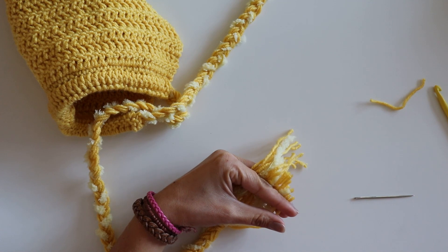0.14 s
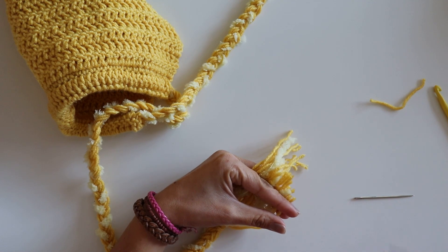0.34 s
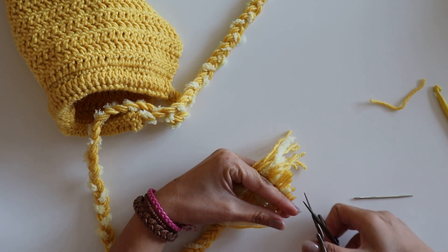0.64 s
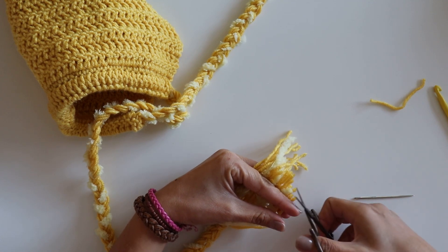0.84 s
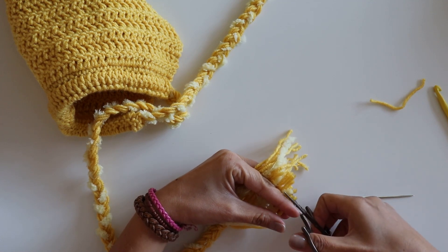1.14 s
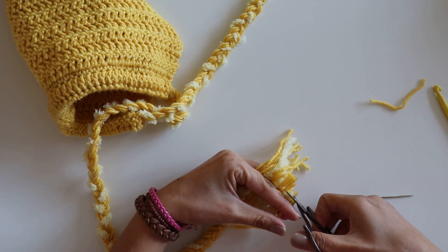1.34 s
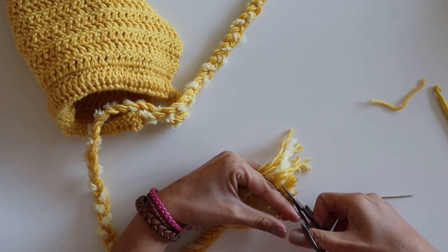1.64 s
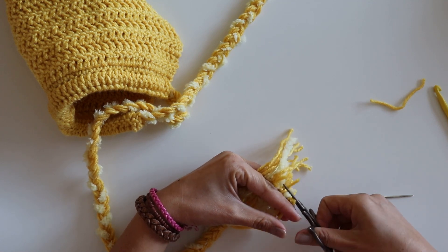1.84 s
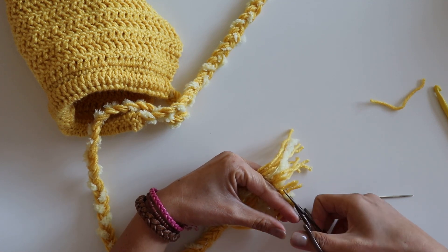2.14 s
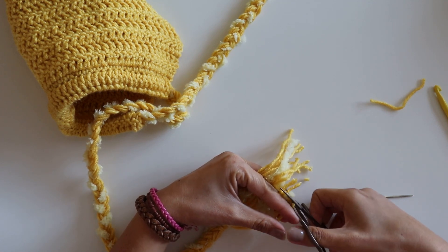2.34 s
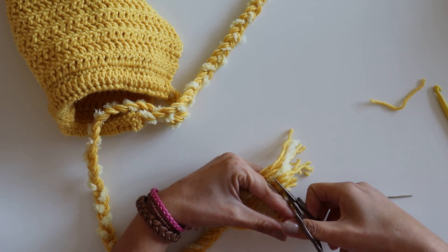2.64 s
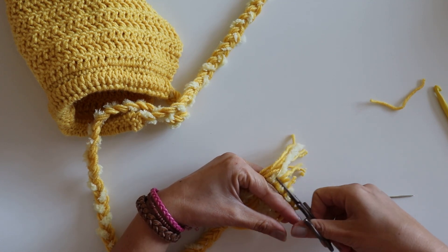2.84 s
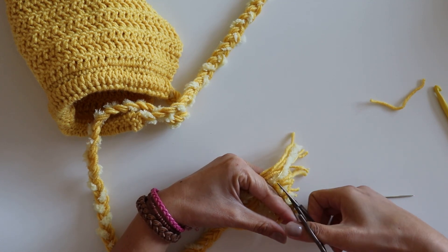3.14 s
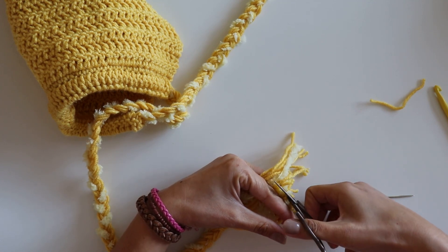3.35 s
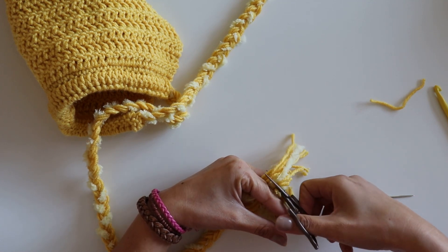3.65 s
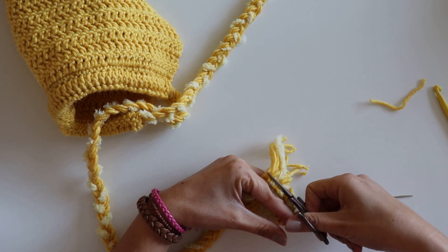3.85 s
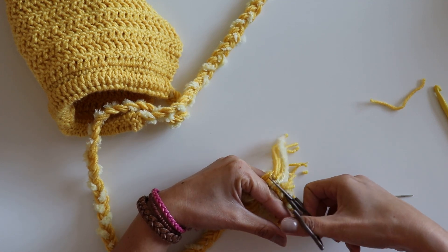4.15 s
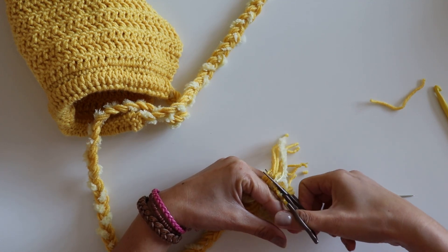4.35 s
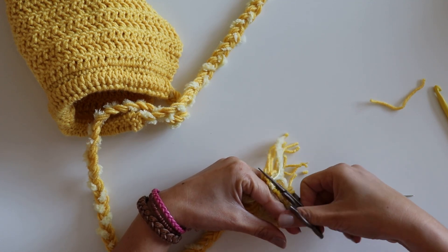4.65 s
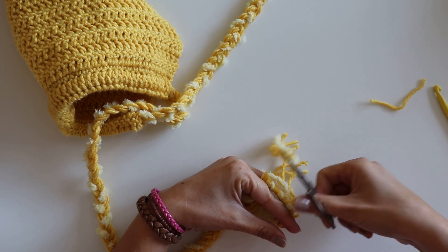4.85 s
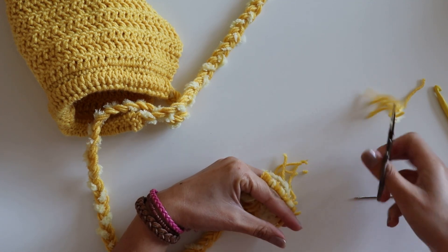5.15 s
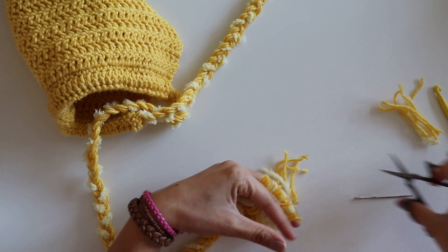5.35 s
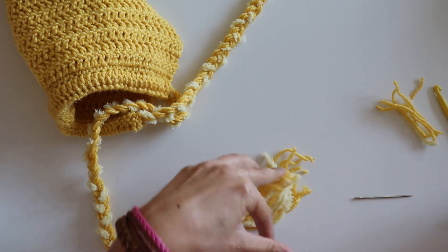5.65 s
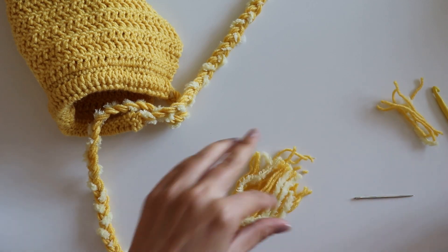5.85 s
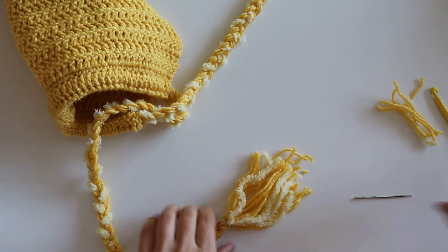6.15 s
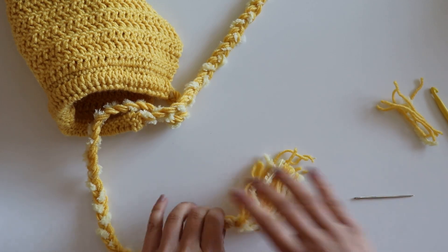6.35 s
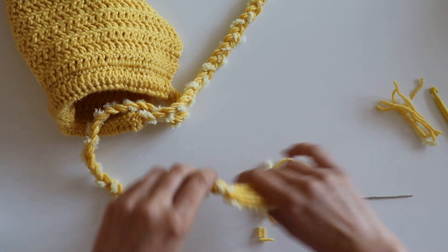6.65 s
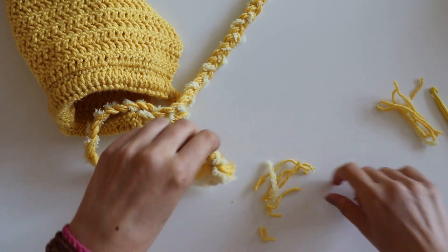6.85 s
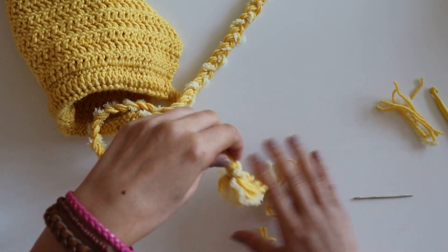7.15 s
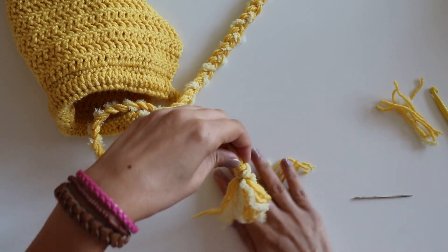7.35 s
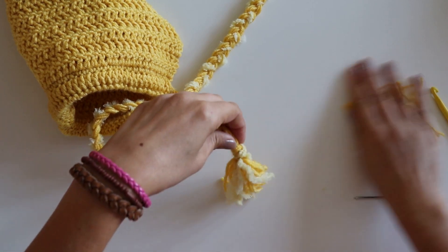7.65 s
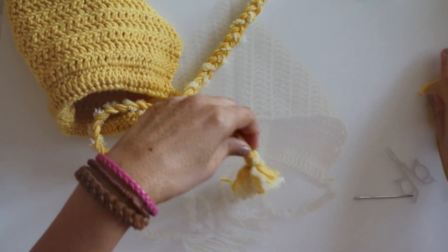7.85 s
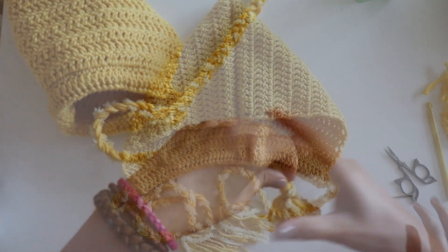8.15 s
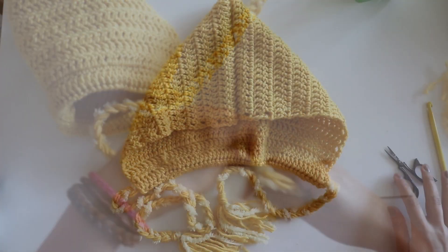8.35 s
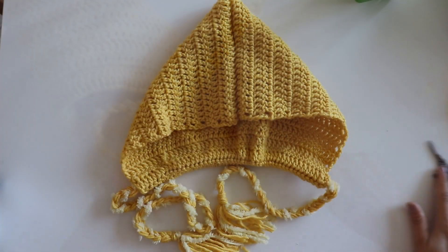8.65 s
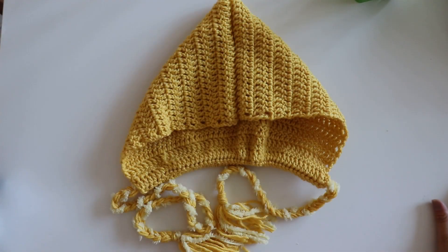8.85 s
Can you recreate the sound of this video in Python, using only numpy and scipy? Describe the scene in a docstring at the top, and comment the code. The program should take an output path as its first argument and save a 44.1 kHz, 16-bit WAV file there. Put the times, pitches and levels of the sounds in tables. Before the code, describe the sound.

Four crisp scissor cuts through yarn in a quiet room, a loud ringing metal drop, then brushing and dragging on a tabletop.

```python
"""Small steel scissors cut a bunch of yarn above a hard table in a quiet room: the blades grind through
strand after strand and snap shut. They are then dropped, bounce and ring in their steel modes.
Things knock and drag on the table, exciting its body; a palm sweeps the offcuts aside with a hiss.
Microphone hiss and a faint room drone lie under everything."""
import sys
import numpy as np
from scipy import signal
from scipy.fft import rfft, irfft, next_fast_len
from scipy.io import wavfile
from scipy.ndimage import uniform_filter1d

SR = 44100
rng = np.random.default_rng(int(sys.argv[2]) if len(sys.argv) > 2 else 0)


def wrap_up_sound(samples):
    """Save the sound to the file named by the first command line argument, as 16-bit audio."""
    columns = np.atleast_2d(samples).T
    # keep every value between -1 and 1, then stretch to whole-number steps
    tamed = np.clip(columns, -1, 1)
    steps = np.round(tamed * 32767).astype(np.int16)
    wavfile.write(sys.argv[1], SR, steps)


N = 396459

# free modes of the scissors: f/Hz, t60/s
STEEL_MODES = [(7988, 0.4), (8629, 0.11), (12575, 0.45), (15400, .2)]
# damped steel resonances: f/Hz, width/Hz, relative level/dB
CLINK_MODES = [(5700, 550, -16.5), (9400, 570, -6.5), (11900, 600, -16), (12130, 560, 0), (16300, 920, 5)]
# scissors hitting the table: columns of hits(), then ring of mode 1/dB, mode 2/dB, mode 3/dB
BOUNCES = [(0.136, -11.5, 6050, -2, 12.5, -6.5, -65, -42, -45),
           (0.196, -20.5, 15300, 2, 13, -6, -65, -43, -37), (0.271, -38.5, 6190, -3, 10, -3, -77, -62, -58),
           (5.783, -25, 780, 2, 5, 1.3, -61, -33, -56.5), (5.842, -1, 2120, -3.5, -3, -8, -43, -58, -55.5),
           (5.851, -19, 7500, -3, -3, -10, -44, -52, -55),
           (5.964, -24.5, 805, -5, 4, -7, -60.5, -46, -58.5),
           (6.063, 14, 3470, -7, 1.4, -15.5, -19, -46.5, -22),
           (6.091, -11, 12700, -7.5, -4, -7, -21.5, -40.5, -16),
           (6.121, -1, 12700, -10, 0.1, -12, -50, -36, -41.5),
           (6.147, -9, 3020, -9, -1.5, -2, -53, -23, -30), (6.174, -15, 7990, -6, -4, 8.5, -33, -28, -62),
           (6.194, -28, 7990, -6, 2, -4, -23, -45, -76), (8.667, -15.5, 11300, -7, 7, 3, -70, -70, -60),
           (8.682, -15, 1020, -20, 9, 0, -70, -70, -60), (8.782, 3, 10860, -3.5, 11.5, -7, -65, -65, -50)]


def shearing():
    """Edge grinds on edge; as each strand gives way the blades sing above and the fibres tick below."""
    # blades closing: start/s, end/s, edge/dB, crunch/dB, steel note/dB
    cuts = [(1.836, 2.0, -56, -62.5, -78), (2.856, 2.973, -54, -65, -75), (3.83, 3.963, -54.5, -59, -74),
            (4.779, 4.821, -44.5, -53, -60)]
    # strands giving way: t/s, singing/dB, crunch/dB
    strands = [(1.866, -51, -56), (1.878, -46, -55), (1.89, -42, -63), (1.9036, -39, -65),
               (1.921, -41, -57), (1.926, -37, -54), (1.9414, -49, -62), (1.954, -40, -53),
               (1.958, -44, -53), (1.98, -36, -50.5), (2.886, -47, -49), (2.9, -44, -58), (2.909, -41, -50),
               (2.92, -44, -61), (2.9417, -48, -55), (2.958, -46, -62), (2.988, -30, -52),
               (3.918, -48, -71), (3.936, -45, -57), (3.941, -38, -48), (4.0068, -31, -41),
               (4.794, -46, -56), (4.8014, -45, -56)]
    # blades reopening: t/s, length/s, singing/dB, crunch/dB
    reopenings = [(2.101, 0.028, -54, -58), (3.104, 0.044, -60, -61), (4.163, .025, -60, -60)]
    # blade resonances: f/Hz, width/Hz, relative level/dB
    blade_peaks = [(7300, 300, -12), (8620, 220, -6), (10400, 350, -7), (11000, 300, -8), (12600, 220, 0),
                   (13500, 400, -6), (14300, 400, -8)]
    # fibre resonances: f/Hz, width/Hz
    fibre_peaks = [(2750, 860), (3550, 640), (4400, 620)]
    # grinding spectrum: f/Hz, density/dB
    grind = [(3240, -36), (5500, -17), (8580, -9), (11800, -10), (12500, -7), (15600, -14.5)]
    edge, crunch, whine = (sum(stroke(*cut[:2], cut[k], attack=0.51, release=0.37) for cut in cuts)
                           for k in (2, 3, 4))
    singing = edge * from_db(4)
    strand_bursts = [(s - .001, 0.011, sing_db, crunch_db) for s, sing_db, crunch_db in strands]
    for s, length_s, sing_db, crunch_db in strand_bursts + reopenings:
        swell = np.hanning(int(length_s * SR))
        add(singing, s, from_db(sing_db) * swell)
        add(crunch, s, from_db(crunch_db) * swell)
    grit = gritty(flicker_hz=250, flicker_db=3.5)
    blades = sum(from_db(db) * resonance(grit, hz, width) * (-1) ** k
                 for k, (hz, width, db) in enumerate(blade_peaks))
    snapping = ticks(per_s=4500, spread_db=5.0)
    fibres = sum(resonance(resonance(snapping, hz, width), hz, width) for hz, width in fibre_peaks)
    note = resonance(grit, STEEL_MODES[1][0], width_hz=190)
    return (edge * coloured(grit, grind) + singing * rms_one(blades)
            + crunch * rms_one(fibres) + whine * rms_one(note))


def snips():
    """The blades snap shut: a bright crack through their resonances."""
    # closures: columns of hits()
    closures = [(2.006, -16, 7730, 1.5, 0, -13), (2.995, -20, 7130, -3, -1, -14),
                (4.011, -9.5, 7260, 0, 0, -14.5), (4.822, -4.5, 10350, -4.5, 0.4, -13.5)]
    # crack colour: level/dB per contact() band
    bands_db = [-46, -32, -37.5, -24, -20, -13]
    # closing blades: f/Hz, width/Hz, relative level/dB
    modes = [(1830, 410, 19), (4380, 350, 11), (7330, 360, 17), (8400, 870, 17.5), (11200, 660, 0),
             (13400, 1900, 11.5)]
    return hits(closures, bands_db, modes, crack_s=0.00068, note_s=0.0019, clink_db=-2.0, lead_db=-20)


def bounces():
    """Steel strikes the table: a click with a strong clink."""
    # crack colour: level/dB per contact() band
    bands_db = [-35.5, -23.5, -17.5, -10, -13.5, -24]
    return hits(BOUNCES, bands_db, CLINK_MODES, crack_s=0.0011, note_s=0.0019, clink_db=5.5, lead_db=-23.5)


def steel_ring():
    """Each bounce chokes the previous ring and shares new energy among the modes."""
    let_go_s = 5.82
    out, t = np.zeros(N), np.arange(SR // 2) / SR
    ends = [row[0] for row in BOUNCES[1:]] + [np.inf]
    for (s, *_, low_db, second_db, third_db), end in zip(BOUNCES, ends):
        damping = 2.5 if s < let_go_s else 1   # the hand shortens the ring
        attack = 1 - np.exp(-t / 0.0018)
        choke = np.exp(-np.maximum(t - (end - s), 0) / 0.0044)
        for (hz, t60), db in zip(STEEL_MODES, (low_db, second_db, third_db, third_db - 18)):
            decay = from_db(db - 60 * t / t60 * damping)
            add(out, s + .001, attack * decay * choke * np.sin(2 * np.pi * hz * (s + t)))
    return out


def knocks():
    """Blows on the table: a longer, fuller crack with almost no clink."""
    # knocks: columns of hits()
    blows = [(0.037, -26, 920, 2, -4, -3), (0.136, -22, 513, -4, -4, -5.5),
             (6.063, -20.5, 119.6, 2, -3, -10), (6.304, -22.5, 270, 1, -2, -11),
             (6.907, -28.5, 407, 0, -1.5, -5), (7.419, -44, 299, -5.5, -5, -12),
             (7.93, -22, 627, -12, 3.5, -2), (7.958, -31.5, 1130, -8.5, -0.5, -0.5),
             (8.585, -25, 1091, -10, -1.5, -2.5), (8.838, -10.5, 1590, -8.5, 1.5, -7.5),
             (8.914, -24.5, 264, -7, 3, 2.5)]
    # crack colour: level/dB per contact() band
    bands_db = [-16, -8, -17, -11, -10.5, -15]
    return hits(blows, bands_db, CLINK_MODES, crack_s=0.0025, note_s=0.0031, clink_db=-41, lead_db=-20)


def dragging():
    """Rough sliding excites the table's body and rumble, a gritty top and, faintly, the steel."""
    # one curve per slide: t/s, body/dB, top/dB
    slides = [
        [(5.28, -73, -77), (5.36, -70, -82), (5.42, -77, -78), (5.55, -63.5, -69), (5.62, -77, -80),
         (5.7, -70, -72)],
        [(6.04, -47, -67), (6.06, -35, -46), (6.1, -37, -31), (6.156, -34, -29.5), (6.222, -35, -40.5),
         (6.29, -48, -44), (6.33, -60, -49), (6.42, -68, -64)],
        [(8.59, -32, -51), (8.614, -33.5, -48), (8.66, -37, -47), (8.68, -34, -42), (8.72, -30.5, -36.5),
         (8.776, -28.5, -33), (8.81, -29.5, -31), (8.9, -29.5, -35.5), (8.93, -29.5, -34), (8.97, -35, -44),
         (8.99, -34, -49)],
    ]
    # dying skids: t/s, body/dB, top/dB, body decay/(dB/s)
    skids = [(0.0, -43.5, -47, 150), (0.039, -49, -55, 350), (0.139, -52, -43, 168),
             (5.849, -25.5, -33.5, 141), (5.786, -47, -57.5, 62), (7.941, -40.5, -45, 171.5)]
    # table under load: start/s, end/s, level/dB
    rumbles = [(0.0, 0.1, -47), (5.324, 5.603, -52), (5.85, 5.976, -56), (6.04, 6.3, -46),
               (6.3, 6.394, -43), (8.79, 8.985, -59), (8.893, 8.996, -37)]
    # table body spectrum: f/Hz, density/dB
    body_spectrum = [(240, -39.5), (400, -14), (484, -9), (671, -8), (746, -3.5), (1790, -2), (2920, -10.5),
                     (5000, -13.5), (6500, -39.5), (11000, -120)]
    # grit spectrum: f/Hz, density/dB
    top_spectrum = [(2000, -3.5), (3500, 2.5), (6000, 4.5), (10000, -1), (16000, -8.5)]
    body = coloured(gritty(flicker_hz=59.4, flicker_db=1.0), body_spectrum)
    grit = gritty(flicker_hz=150, flicker_db=1.5)
    steel = rms_one(resonance(grit, STEEL_MODES[2][0], width_hz=250))
    top = coloured(grit, top_spectrum) + from_db(-16) * steel
    rumble = band(gritty(flicker_hz=30, flicker_db=3.5), 200, 840)
    body_gain, top_gain = gain_curve(slides, column=1), gain_curve(slides, column=2)
    t = np.arange(SR // 2) / SR
    for s, body_db, top_db, db_per_s in skids:
        add(body_gain, s, from_db(body_db - db_per_s * t))
        add(top_gain, s, from_db(top_db - 2.1 * db_per_s * t))
    load = sum(stroke(*row, attack=.2, release=0.55) for row in rumbles)
    return body_gain * body + top_gain * top + load * rumble


def sweeping():
    """Skin on the table top: a smooth hiss with an airy top."""
    # palm strokes: start/s, end/s, hiss/dB, air/dB, hiss attack share, hiss release share
    sweeps = [(5.48, 5.62, -63, -76, .3, .5), (6.65, 6.9, -53, -71, 0.57, 0.16),
              (6.9, 7.05, -56.5, -62, 0.042, 0.92), (7.47, 7.936, -45.5, -46.5, 0.15, 0.17)]
    # skin friction spectrum: f/Hz, density/dB
    palm = [(530, -37), (900, -27), (1000, -18), (1860, -11), (2800, -23), (3810, -12.5), (4510, -10),
            (9450, -6.5), (14200, -13), (15600, -9)]
    air_slower = 2.2   # the airy top needs full speed
    skin = gritty(flicker_hz=40.1, flicker_db=0.7)
    hiss = air = 0
    for start, end, hiss_db, air_db, attack, release in sweeps:
        hiss += stroke(start, end, hiss_db, attack, release)
        air += stroke(start, end, air_db, air_slower * attack, air_slower * release)
    return hiss * coloured(skin, palm) + air * band(skin, 11000, 17000)


def squeaks():
    """Short soft tones."""
    # squeaks: t/s, length/s, f/Hz, peak/dB
    tones = [(5.54, 0.099, 502, -47), (5.59, .03, 814, -46.5)]
    out = np.zeros(N)
    for s, length_s, hz, peak_db in tones:
        t = np.arange(int(length_s * SR)) / SR
        add(out, s, from_db(peak_db) * np.hanning(len(t)) * np.sin(2 * np.pi * hz * t))
    return out


def room(x):
    """Diffuse echoes: a noise tail that builds up after 3 ms and dies band by band."""
    # reverberation: f/Hz, t60/s
    t60 = [(200, 0.53), (1000, 0.41), (3000, 0.45), (7000, 0.37), (14000, 0.2)]
    t, tail = np.arange(int(.9 * SR)) / SR, 0
    edges_hz = 100 * 2 ** np.arange(0, 7.6, .5)
    for low, high in zip(edges_hz, edges_hz[1:]):
        sos = signal.butter(2, [low, high], "band", fs=SR, output="sos")
        decay = from_db(-60 * t / at_hz(t60, np.sqrt(low * high)))
        tail += signal.sosfilt(sos, rng.standard_normal(len(t))) * decay
    tail *= np.clip((t - .003) / 0.0042, 0, 1)
    return signal.fftconvolve(x, tail / np.sqrt(np.sum(tail ** 2)))[:N]


def background():
    """Broad room tone and hiss, narrow wavering bands of drone and a low hum."""
    # room tone level: t/s, level/dB
    levels = [(0, -55.5), (7.9, -55), (8.2, -58.5), (8.45, -57.5), (8.99, -53)]
    # room tone and hiss: f/Hz, density/dB
    spectrum = [(12, -40), (20, 1.5), (53, -7), (68, -9), (85, 1), (109, -16), (202, -6.5), (260, -4),
                (316, -0.5), (343, -37), (405, -12.5), (493, -8), (770, -10.5), (1200, -15.5), (15600, -21)]
    # drone bands: f/Hz, width/Hz, initial level/dB
    drone_bands = [(162, 22, -64), (200, 9.5, -66.5), (312.2, 23, -61), (569, 16, -71), (778, 4, -70)]
    hum_hz, hum_initial_db = 83.2, -60.5
    white = rng.standard_normal(N)
    drone = sum(from_db(db) * rms_one(resonance(white, hz, width)) for hz, width, db in drone_bands)
    wander_rad = 1.4 * rms_one(resonance(white, hz=2.3, width_hz=1.5))
    hum = from_db(hum_initial_db) * np.sqrt(2) * np.sin(2 * np.pi * hum_hz * np.arange(N) / SR + wander_rad)
    gain = gain_curve([levels])
    return gain * coloured(rng.standard_normal(N), spectrum) + gain / gain[0] * (drone + hum)


def side_noise():
    """A trace of noise that widens the background."""
    # f/Hz, density/dB
    spectrum = [(12, -22), (20, -1.5), (85, 6.5), (282, -3.5), (962, -7), (1590, -13.5), (4450, -12.5),
                (8450, -10.5), (15600, -10)]
    return from_db(-71) * coloured(rng.standard_normal(N), spectrum)


def hits(rows, bands_db, modes, crack_s, note_s, clink_db, lead_db):
    """Each hit cracks, clinks and sounds a short split note; returns direct sound and room feed.
    Rows: t/s, level/dB, note f/Hz, relative note level/dB, tilt/(dB/band), room send/dB."""
    direct, feed, t = np.zeros(N), np.zeros(N), np.arange(2200) / SR
    for s, level_db, hz, note_db, tilt_db, room_db, *_ in rows:
        crack = contact(np.add(bands_db, tilt_db * np.arange(len(bands_db))), crack_s)
        crack += sum(from_db(clink_db + db) * resonance(crack, f, width) for f, width, db in modes)
        crack /= 2.96 * np.sqrt(uniform_filter1d(crack ** 2, size=60).max())   # peak near 1
        pair = np.sin(2 * np.pi * hz * t) * np.cos(2 * np.pi * 0.015 * hz * t)
        note = from_db(note_db) * pair * np.exp(-t / note_s) * (1 - np.exp(-t / 0.000091))
        add(direct, s - .002, from_db(level_db + lead_db) * crack)   # faint first touch
        add(direct, s + .001, from_db(level_db) * (crack + note))
        add(feed, s + .001, from_db(level_db + room_db) * (crack + from_db(-3.5) * note))
    return direct, feed


def contact(bands_db, crack_s):
    """Hard contact: a crack of dying noise; the body's lower bands answer longer."""
    # band edges of thud, knock, clack, click, tick, sizzle: f/Hz
    edges_hz = [70, 400, 1200, 2500, 5000, 9000, 17000]
    t, out = np.arange(2200) / SR, 0
    for low, high, db in zip(edges_hz, edges_hz[1:], bands_db):
        envelope = np.exp(-t / (crack_s + 5.1 / high)) * (1 - np.exp(-t / 0.00027))
        out += from_db(db) * band(rng.standard_normal(len(t)) * envelope, low, high)
    return out


def gritty(flicker_hz, flicker_db):
    """Rough contact: noise whose level jumps about."""
    r = np.exp(-2 * np.pi * flicker_hz / SR)
    slow = rms_one(signal.lfilter([1], [1, -2 * r, r * r], rng.standard_normal(N)))
    return rng.standard_normal(N) * from_db(flicker_db * slow)


def ticks(per_s, spread_db):
    """Random clicks of uneven size, rms 1."""
    onsets = rng.random(N) < per_s / SR
    sizes = from_db(spread_db * np.minimum(rng.exponential(1, N), 4))
    return rms_one(onsets * sizes * rng.choice([-1, 1], N))


def stroke(start_s, end_s, db, attack, release):
    """Gain of a movement: swell, hold, fade; attack and release are shares of its length."""
    length_s, low_db = end_s - start_s, db - 15.5
    full_s = start_s + length_s * np.clip(attack, .01, .98)
    fade_s = max(end_s - length_s * np.clip(release, .01, .98), full_s + .001)
    return gain_curve([[(start_s, low_db), (full_s, db), (fade_s, db), (max(end_s, full_s + .002), low_db)]])


def gain_curve(curves, column=1):
    """Gain from curves of t/s and level/dB, silent between them."""
    db, t = np.full(N, -150.), np.arange(N) / SR
    for rows in map(np.array, curves):
        inside = (t >= rows[0, 0]) & (t <= rows[-1, 0])
        db[inside] = np.interp(t[inside], rows[:, 0], rows[:, column])
    return from_db(db)


def coloured(x, spectrum):
    """Shaped by a spectrum, rms 1."""
    size = next_fast_len(len(x))
    gain = from_db(at_hz(spectrum, np.fft.rfftfreq(size, 1 / SR)))
    return rms_one(irfft(rfft(x, size) * gain, size)[:len(x)])


def resonance(x, hz, width_hz):
    """Two-pole resonance, peak gain 1."""
    r = np.exp(-np.pi * width_hz / SR)
    feedback = [1, -2 * r * np.cos(2 * np.pi * hz / SR), r * r]
    return signal.lfilter(np.array([1, 0, -1]) * (1 - r * r) / 2, feedback, x)


def band(x, low_hz, high_hz):
    """Band-passed, rms 1."""
    return rms_one(signal.sosfilt(signal.butter(2, [low_hz, high_hz], "band", fs=SR, output="sos"), x))


def at_hz(points, hz):
    """Interpolates over log frequency."""
    freqs_hz, values = np.array(points).T
    return np.interp(np.log(hz + 1e-9), np.log(freqs_hz), values)


def add(track, s, sound):
    """Mixes a sound in at s seconds."""
    i = round(s * SR)
    track[i:i + len(sound)] += sound[:N - i]


def from_db(db):
    """Decibels to gain."""
    return 10 ** (np.asarray(db) / 20)


def rms_one(x):
    """Scaled to rms 1."""
    return x / np.sqrt(np.mean(x ** 2) + 1e-20)


def scene():
    """Sources and room in the centre, faint noise at the sides."""
    blows, blow_feed = np.sum([snips(), knocks(), bounces()], axis=0)
    sustained = shearing() + dragging() + sweeping() + squeaks() + steel_ring()
    echoes = room(blow_feed + from_db(-10.5) * sustained)
    mid = blows + sustained + echoes + background()
    side = side_noise()
    return np.array([mid + side, mid - side])


def record(dry):
    """The loudest peaks clip; a steep low-pass cuts the top."""
    cutoff_hz = 15700
    lowpass = signal.ellip(12, .2, 55, cutoff_hz, fs=SR, output="sos")
    return signal.sosfilt(lowpass, np.clip(dry, -.92, .92))


dry = scene()
out = record(dry)
wrap_up_sound(out)
```